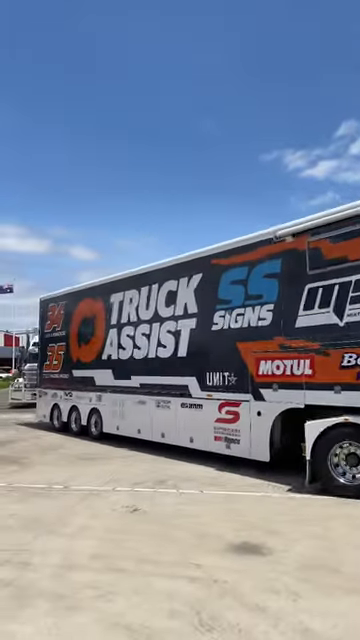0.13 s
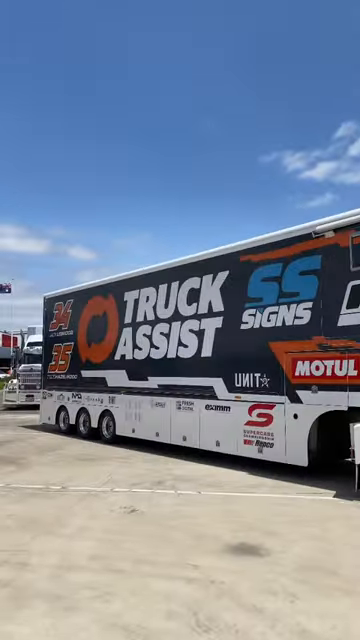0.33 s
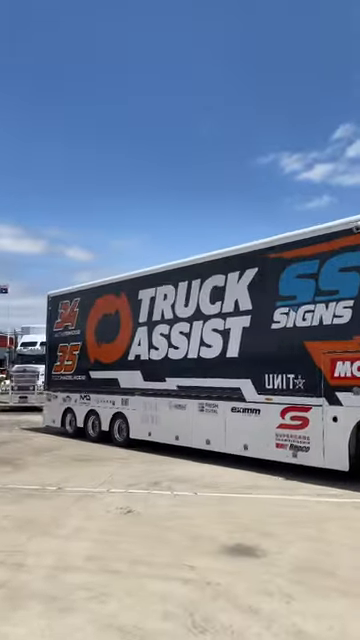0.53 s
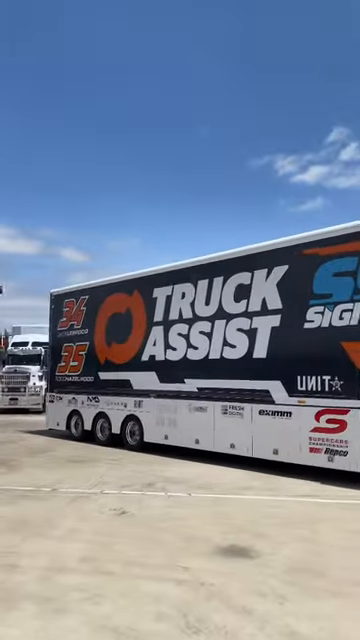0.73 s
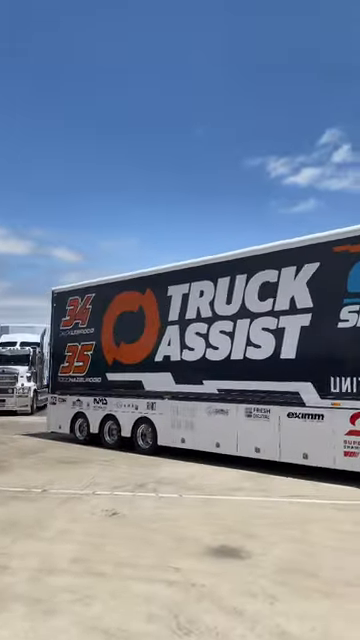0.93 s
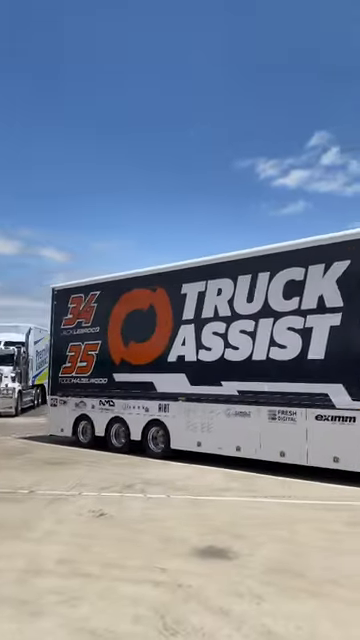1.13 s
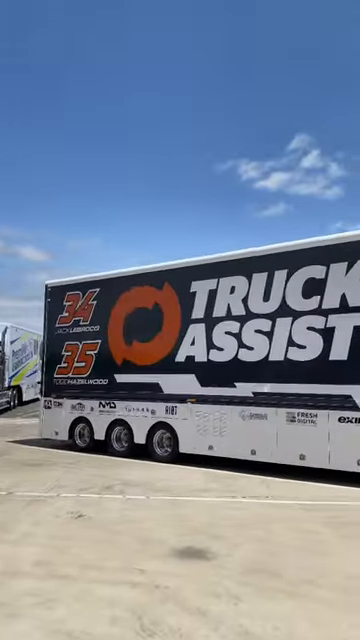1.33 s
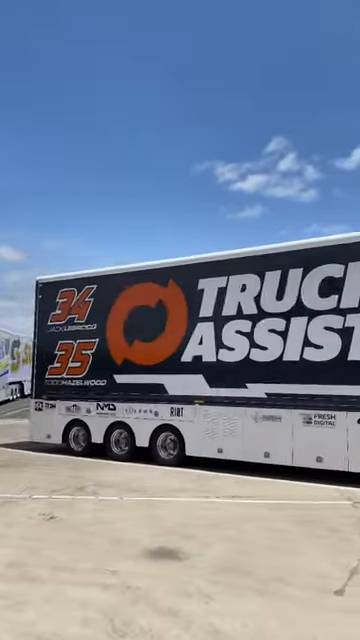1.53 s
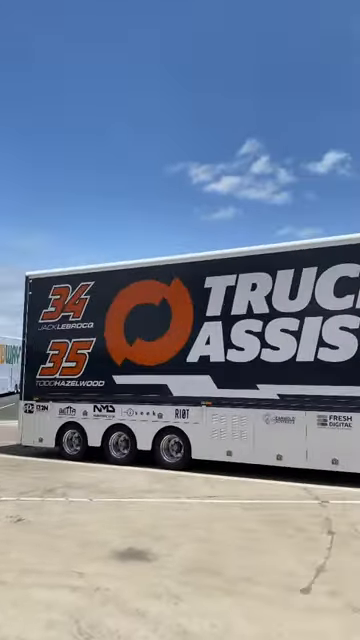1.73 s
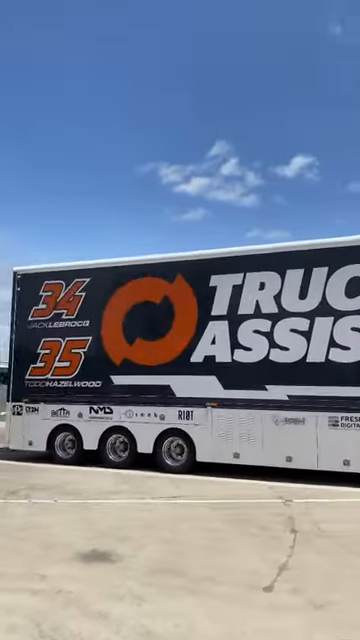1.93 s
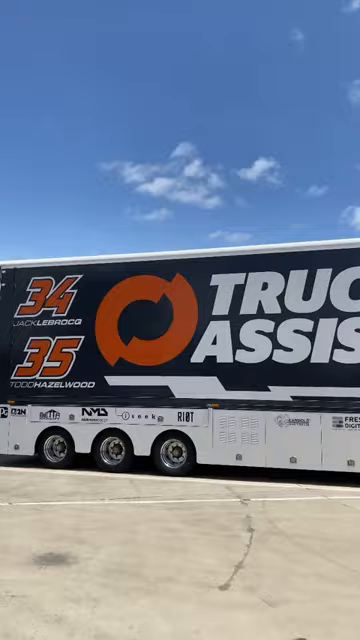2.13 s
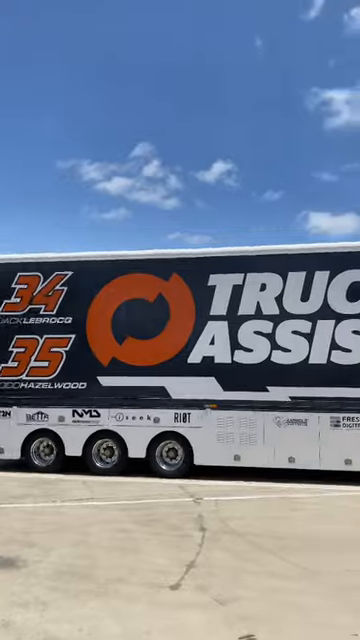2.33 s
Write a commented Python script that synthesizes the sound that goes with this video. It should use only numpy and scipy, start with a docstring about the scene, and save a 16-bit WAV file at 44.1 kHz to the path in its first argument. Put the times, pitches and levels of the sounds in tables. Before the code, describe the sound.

A truck's diesel engine clatters and throbs louder as its revs rise, with an air horn blast

```python
"""A truck's six-cylinder diesel clatters and its exhaust throbs louder as the revs rise unevenly.
The exhaust is firing-locked tones over shaped noise; the clatter is noise knocking at each firing.
A parked engine drones on steady tones; compressed air hisses out as noise that dulls and dies.
A reedy air horn sounds for most of a second: wavering harmonics and a rasp, echoed by the yard."""
import sys
import numpy as np
from scipy import signal
from scipy.fft import rfft, irfft
from scipy.io import wavfile

SR = 44100
rng = np.random.default_rng(int(sys.argv[2]) if len(sys.argv) > 2 else 0)


def wrap_up_sound(samples):
    """Save the sound to the file named by the first command line argument, as 16-bit audio."""
    columns = np.atleast_2d(samples).T
    # keep every value between -1 and 1, then stretch to whole-number steps
    tamed = np.clip(columns, -1, 1)
    steps = np.round(tamed * 32767).astype(np.int16)
    wavfile.write(sys.argv[1], SR, steps)


N = 104649
T, HZ = np.arange(N) / SR, np.fft.rfftfreq(N, 1 / SR)
CYLINDERS = 6

# truck firing rate, shared by exhaust and engine: time_s, firing_hz
FIRING_RATE = [(0, 56.86), (.93, 57.03), (1.02, 58.03), (1.23, 58.96), (1.4, 60.96), (1.47, 61.58),
               (1.7, 58.52), (1.9, 58.3), (2.1, 61.4), (2.2, 62.73), (2.37, 62.9)]


def amp(db):
    """Decibels to gain."""
    return 10 ** (np.asarray(db) / 20)


def curve(points):
    """Control curve at every sample, linear between points."""
    return np.interp(T, *np.transpose(points))


def read(points, hz, column=1):
    """One table column, interpolated on a log-frequency axis."""
    table = np.transpose(points)
    return np.interp(np.log(hz + 1), np.log(table[0] + 1), table[column])


def waver(rate_hz):
    """Slow random signal of zero mean and unit RMS."""
    lowpass = np.exp(-(HZ / rate_hz) ** 2) * (HZ > 0)
    x = irfft(rfft(rng.standard_normal(N)) * lowpass, N)
    return x / x.std()


def complex_waver(rate_hz):
    """Independent in-phase and quadrature wavers: amplitude and phase both wander."""
    return waver(rate_hz) + 1j * waver(rate_hz)


def noise(spectrum):
    """Two unrelated Gaussian noises with the given density."""
    white = rfft(rng.standard_normal((2, N)))
    return irfft(white * amp(read(spectrum, HZ)), N) * np.sqrt(SR / 2)


def ports(pair, field):
    """Blend a shared and a stray sound into two microphone ports, by frequency."""
    ends = np.minimum(np.minimum(T, T[::-1]) / .003, 1)
    shared, stray = rfft(pair * ends)
    likeness = np.clip(read(field, HZ), -1, 1)
    lead_rad = read(field, HZ, column=2)
    tilt = amp(read(field, HZ, column=3))
    blend = likeness * shared + np.sqrt(1 - likeness ** 2) * stray
    left = blend * tilt * np.exp(1j * lead_rad)
    level = np.sqrt(2 / (1 + tilt ** 2))  # holds the pair's total power
    return irfft(np.array([left, shared]) * level, N)


def orders(hz, table, unsteady, rate_hz, loose=True):
    """Unsteady tones locked to a cycle rate; start phases are random if loose, else aligned."""
    turns = np.cumsum(hz) / SR
    total = np.zeros(N)
    for multiple, level_db in table:
        tone = np.exp(2j * np.pi * (multiple * turns + loose * rng.random()))
        unsteadiness = 1 + unsteady * complex_waver(rate_hz)
        total += amp(level_db) * (tone * unsteadiness).real
    return np.sqrt(2) * total


# exhaust level: time_s, level_db
EXHAUST_LEVEL = [(0, -57.5), (.8, -48), (1.0, -39), (1.2, -35), (1.35, -29.5), (1.47, -23), (1.56, -25.5),
                 (1.68, -28.5), (1.9, -26.5), (2.04, -27), (2.14, -24), (2.37, -21.5)]
# firing-rate boom: time_s, level_db
BOOM_LEVEL = [(0, -73), (.85, -38.5), (1.0, -37), (1.06, -45), (1.12, -38), (1.19, -36), (1.25, -43),
              (1.33, -46), (1.41, -30.5), (1.6, -31.5), (1.72, -34.5), (1.87, -27), (2.0, -28.5),
              (2.07, -34), (2.15, -24.5), (2.37, -27.5)]
# pipe bark at three times the firing rate: time_s, level_db
BARK_LEVEL = [(0, -58.5), (.6, -50), (.97, -49), (1.11, -36.5), (1.19, -44), (1.25, -36), (1.35, -33),
              (1.44, -38), (1.5, -39.5), (1.57, -40.5), (1.7, -35), (1.93, -33), (2.0, -44.5),
              (2.04, -35.5), (2.09, -40.5), (2.31, -40), (2.37, -48)]
# pulse harmonics: firing_multiple, db_re_exhaust_level
FIRING_HARMONICS = [(2, 0.5), (4, -21)]
# uneven cylinders: engine_cycle_multiple, db_re_exhaust_level
UNEVEN_ORDERS = [(8, -26.5), (9, -19), (10, -12.5), (11, -22), (13, -22), (14, -21), (15, -17.5), (16, -17),
                 (17, -24.5), (20, -33), (22, -23.5)]
# turbulent rumble at the loudest exhaust: freq_hz, density_db_per_hz
RUMBLE_SPECTRUM = [(15, -81.5), (28, -97.5), (45, -56), (90, -57), (160, -54.5), (230, -60), (320, -84),
                   (600, -118)]
LOW_CUT_HZ = 50
RUMBLE_FOLLOWS_DB_PER_DB, RUMBLE_WIDTH = 0.71, 0.12


def exhaust():
    """Firing pulses thinned in the deep bass, uneven cylinder tones, and turbulent rumble."""
    firing_hz, level_db = curve(FIRING_RATE), curve(EXHAUST_LEVEL)
    boom = orders(firing_hz, [(1, 1.0)], unsteady=0.11, rate_hz=4.5, loose=False)
    boom *= amp(curve(BOOM_LEVEL))
    pulses = orders(firing_hz, FIRING_HARMONICS, unsteady=0.032, rate_hz=10, loose=False)
    pulses *= amp(level_db)
    bark = orders(firing_hz, [(3, 0.016)], unsteady=0.044, rate_hz=7.9, loose=False)
    bark *= amp(curve(BARK_LEVEL))
    low_cut = signal.butter(2, LOW_CUT_HZ, "high", fs=SR)
    throb = signal.lfilter(*low_cut, boom + pulses + bark)
    uneven = orders(firing_hz / CYLINDERS, UNEVEN_ORDERS, unsteady=0.19, rate_hz=8.5)
    uneven *= amp(level_db)
    rumble_gain = amp(RUMBLE_FOLLOWS_DB_PER_DB * (level_db - level_db.max()))
    rumble, spread = noise(RUMBLE_SPECTRUM) * rumble_gain
    sides = RUMBLE_WIDTH * np.array([spread, -spread])
    balance_db = [[-.35], [.35]]
    return (uneven - throb + rumble + sides) * amp(balance_db)


# block tones: engine_cycle_multiple, level_db
BLOCK_TONES = [(9, -47), (14, -52.5), (18, -55), (21, -58.5), (27, -56.5), (33, -62), (39, -61)]
# clatter before its level curve: freq_hz, density_db_per_hz
CLATTER_SPECTRUM = [(20, -80.5), (45, -58.5), (100, -57), (200, -67), (330, -68.5), (550, -70), (800, -72),
                    (1200, -73.5), (2000, -79), (2700, -87), (4400, -99), (9000, -115)]
# clatter gain: time_s, gain_db
CLATTER_GAIN = [(0, -5), (.45, -4.5), (.85, -3.5), (1.1, -3.5), (1.5, -1.5), (1.8, 1.2), (2.05, 1.2),
                (2.37, 2)]
# running hiss before its level curve: freq_hz, density_db_per_hz
FIZZ_SPECTRUM = [(1200, -100), (2500, -91.5), (3500, -88), (4400, -93), (5600, -91), (8000, -92.5),
                 (10500, -119.5), (13000, -104), (15200, -113)]
# running hiss gain: time_s, gain_db
FIZZ_GAIN = [(0, -5), (.5, -2.5), (.82, -1.5), (1.25, 3.5), (1.6, 2.5), (1.8, 3.5), (2.07, 0.5),
             (2.37, 7.5)]
# truck stereo: freq_hz, likeness, left_lead_rad, left_minus_right_db
TRUCK_FIELD = [(60, 1, -0.5, -1.5), (151, 0.86, -0.3, 0), (322, 0.96, 0.8, -3), (652, .6, -1.26, -7),
               (1140, 0.87, -2, -8), (1745, 0.81, 0, -6.5), (2290, 0.64, -1.3, 1), (2940, 0.32, -2.5, -5),
               (4500, 0.52, -3, -.5), (5720, .6, -4.5, 1), (7330, 0.67, -3, 1.5), (8350, 1, -np.pi, -2),
               (11300, 1, -np.pi, -0.5), (12300, 0.45, -2.5, 0.5), (14450, .7, -3, -0.5)]
KNOCK_DEPTH, KNOCK_DECAY_CYCLES = 0.19, 0.16  # cycles of firing


def engine():
    """Block tones, noise that knocks and decays at each firing, and a fine running hiss."""
    firing_hz = curve(FIRING_RATE)
    block = orders(firing_hz / CYLINDERS, BLOCK_TONES, unsteady=0.54, rate_hz=10)
    firing_phase = np.cumsum(firing_hz) / SR % 1
    knock = 1 + KNOCK_DEPTH * np.exp(-firing_phase / KNOCK_DECAY_CYCLES)
    knock /= np.sqrt(np.mean(knock ** 2))
    clatter = noise(CLATTER_SPECTRUM) * knock * amp(curve(CLATTER_GAIN) + 0.74 * waver(25))
    fizz = noise(FIZZ_SPECTRUM) * amp(curve(FIZZ_GAIN) + 0.7 * waver(25))
    return block + ports(clatter + fizz, TRUCK_FIELD)


PARKED_HZ = 53.95
# parked engine tones: firing_multiple, level_db
PARKED_TONES = [(1, -44), (2.5, -54.5)]


def parked_engine():
    """A low drone: two slightly unsteady tones at a constant firing rate."""
    return orders(np.full(N, PARKED_HZ), PARKED_TONES, unsteady=0.089, rate_hz=15)


# jet as the valve opens: freq_hz, density_db_per_hz
AIR_FRESH = [(800, -100), (2000, -79), (3000, -86), (4100, -88), (5800, -78), (8000, -87), (10500, -91),
             (12800, -85.5), (15200, -101)]
# jet once dulled: freq_hz, density_db_per_hz
AIR_DULLED = [(800, -93), (2000, -77.5), (3000, -82.5), (4100, -81), (5800, -76), (8000, -82.5),
              (10500, -96), (12800, -99.5), (15200, -108)]
# air stereo: freq_hz, likeness, left_lead_rad, left_minus_right_db
AIR_FIELD = [(393, 1, 1, -5), (613, 0.73, -1, -5), (810, 0.65, -2.5, -6), (1040, 0.61, -1.5, -9),
             (1700, 0.53, -7, -5), (2007, 0.69, -5.5, -2), (2820, 0.59, -11, -2.5),
             (5070, 0.83, -10.5, -3.5), (5600, .8, -11, 2.5), (7540, 0.47, -9.5, -0.5),
             (8380, 1, -3 * np.pi, -0.5), (11500, 1, -3 * np.pi, 7), (11600, 0.21, -10, -3),
             (14200, 0.89, -7.5, 4)]
AIR_START_S, AIR_RISE_S, AIR_END_S = 0.83, 0.085, 1.156
AIR_FADE_DB_PER_S, AIR_DULL_S = 103.5, 0.27


def air_release():
    """A valve opens, air jets out, and the hiss dulls and dies as the pressure falls."""
    age_s = T - AIR_START_S
    fade_db = -AIR_FADE_DB_PER_S * np.maximum(T - AIR_END_S, 0)
    flow = np.clip(age_s / AIR_RISE_S, 0, 1) * amp(fade_db)
    spent = np.clip(age_s / AIR_DULL_S, 0, 1) ** 2
    jet = noise(AIR_FRESH) * np.sqrt(1 - spent) + noise(AIR_DULLED) * np.sqrt(spent)
    return ports(jet * flow * amp(.5 * waver(30)), AIR_FIELD)


# yard echo decay: freq_hz, t60_s
YARD_DECAY = [(200, 0.96), (800, 0.98), (3000, 0.74), (8000, 0.4)]


def yard(x):
    """Scattered echoes from trailers and paving, the treble dying first."""
    taps = rng.standard_normal((2, SR)) * (rng.random((2, SR)) < 2000 / SR)  # about 2000 per second
    hz, t, z = signal.stft(taps, SR, nperseg=256)
    decay = amp(-60 * t / read(YARD_DECAY, hz)[:, None])
    tail = signal.istft(z * decay, SR, nperseg=256)[1]
    return signal.fftconvolve(x, tail / np.linalg.norm(tail[0]), axes=1)[:, :N]


# horn pitch before jitter: time_s, pitch_hz
HORN_PITCH_HZ = [(.95, 203.3), (1.01, 201.8), (1.05, 203.2), (1.17, 202.8), (1.25, 204), (1.3, 203.6),
                 (1.35, 204.9), (1.41, 203.2), (1.54, 203.9), (1.6, 201.7), (1.66, 205.2), (1.7, 204),
                 (1.78, 205.4)]
# horn harmonic balance: freq_hz, db_re_horn_db
HORN_BALANCE = [(203, -5.5), (407, -0.6), (610, -2), (814, -3.5), (1020, -5), (1220, -9), (1430, -9.5),
                (1630, -10.5), (1830, -10.5), (2040, -10), (2240, -16.5), (2450, -14), (2850, -14),
                (3800, -23), (4600, -19.5), (6000, -23.5), (8000, -29.5)]
# second harmonic swell: time_s, gain_db
SECOND_SWELL = [(.96, 3.5), (1.0, -12), (1.05, -1.5), (1.13, -8), (1.17, 6), (1.21, 3), (1.26, -3),
                (1.32, 4), (1.355, 0), (1.39, -17), (1.44, 0.5), (1.5, -0.5), (1.6, 2), (1.7, 1.5),
                (1.76, -4.5)]
# third harmonic swell: time_s, gain_db
THIRD_SWELL = [(.95, 6.5), (1.02, 6), (1.07, -3), (1.11, 5), (1.165, -8), (1.205, 4.5), (1.24, -5),
               (1.27, 8), (1.31, -3.5), (1.35, 4), (1.425, -11.5), (1.485, 2.5), (1.53, -10), (1.56, -2.5),
               (1.66, 0), (1.72, -2), (1.77, 1.5)]
# fourth harmonic swell: time_s, gain_db
FOURTH_SWELL = [(.98, 0), (1.06, 3), (1.12, -1.5), (1.18, -2.5), (1.23, -2), (1.28, 5), (1.32, -1.5),
                (1.45, -1), (1.51, 6.5), (1.55, -7), (1.6, 6.5), (1.64, 1), (1.71, 5), (1.77, 3)]
# brief flares of the harmonics near 2 kHz: time_s, gain_db
FLARE_SWELL = [(1.0, 2.5), (1.08, -4.5), (1.13, 5.5), (1.17, 1), (1.22, 3.5), (1.29, -5.5), (1.35, 6.5),
               (1.42, -5), (1.49, 2), (1.53, -7.5), (1.58, -2), (1.61, -6), (1.655, 3), (1.71, -3.5),
               (1.78, -5.5)]
# air rasping through the horn, before flow: freq_hz, density_db_per_hz
RASP_SPECTRUM = [(200, -100), (500, -76.5), (800, -73.5), (1300, -76.5), (1800, -77), (2400, -82.5),
                 (3200, -89.5), (6000, -105)]
# horn stereo: freq_hz, likeness, left_lead_rad, left_minus_right_db
HORN_FIELD = [(400, .9, -.6, -5.5), (610, .8, -1.55, -5.5), (810, 0.52, -2.5, -6), (1020, .65, -1.54, -7.5),
              (1300, .55, -1.4, -6), (1600, .65, 0, -4), (2050, .75, 0, -3.5), (2520, .65, 1, -1.5),
              (2840, .6, 2.5, -1.5), (5400, 0.55, 1.8, -0.5), (8300, 1, np.pi, -1)]
HORN_START_S, HORN_END_S, HORN_RISE_S, HORN_FADE_S = 0.95, 1.756, .012, 0.17
HORN_DB, HORN_JITTER = -40.5, 0.0075  # jitter: RMS fraction of pitch
HORN_BLOOM_S = 0.013  # extra rise time per harmonic above the third
HORN_DULL_DB_PER_S = 6.5  # sag of harmonics without a swell curve
RASP_PUFF_CYCLES, RASP_FADE_DB_PER_S, RASP_RISE_S = .3, 14, 0.043


def horn(fading=0.92, fading_hz=22, strong_fading=0.16, flare_fading=0.55, wet_db=-13, count=39):
    """An air-blown diaphragm buzzes and rasps; high harmonics rise slower and stop sooner."""
    pitch_hz = curve(HORN_PITCH_HZ)
    turns = np.cumsum(pitch_hz * (1 + HORN_JITTER * waver(90))) / SR
    swells = {2: SECOND_SWELL, 3: THIRD_SWELL, 4: FOURTH_SWELL}
    age_s, after_s = T - HORN_START_S, np.maximum(T - HORN_END_S, 0)
    pair = np.zeros((2, N))
    for k in range(1, count + 1):
        onset = np.clip(age_s / (HORN_RISE_S + HORN_BLOOM_S * max(k - 3, 0)), 0, 1)
        release = np.exp(-k * after_s / HORN_FADE_S)
        swell_db, depth = -HORN_DULL_DB_PER_S * age_s, fading
        if k in swells:
            swell_db, depth = curve(swells[k]), strong_fading
        elif k in (9, 10, 11):
            swell_db, depth = curve(FLARE_SWELL), flare_fading
        level_db = HORN_DB + read(HORN_BALANCE, k * pitch_hz.mean()) + swell_db
        carrier = np.exp(2j * np.pi * (k * turns + rng.random()))
        tone = amp(level_db) * onset * release * carrier
        shared = (1 + depth * complex_waver(fading_hz)) / np.sqrt(1 + 2 * depth ** 2)
        stray = complex_waver(fading_hz) / np.sqrt(2)
        pair += np.sqrt(2) * np.array([tone * shared, tone * stray]).real
    flow = np.clip(age_s / RASP_RISE_S, 0, 1) * amp(-RASP_FADE_DB_PER_S * age_s)
    flow *= np.exp(-10 * after_s / HORN_FADE_S)
    puffs = np.exp(-(turns % 1) / RASP_PUFF_CYCLES)
    pair += noise(RASP_SPECTRUM) * flow * puffs / np.sqrt(np.mean(puffs ** 2))
    return ports(pair + amp(wet_db) * yard(pair), HORN_FIELD)


def scene():
    """Sum of everything heard in the yard."""
    return exhaust() + engine() + parked_engine() + air_release() + horn()


EDGE_HZ = 15400


def record(dry):
    """The recorder's zero-phase band limit, with a 4 ms fade at each end."""
    ends = np.minimum(np.minimum(T, T[::-1]) / .004, 1)
    lowpass = signal.firwin(255, EDGE_HZ, window=("kaiser", 9), fs=SR)
    return signal.filtfilt(lowpass, 1, dry * ends)


dry = scene()
out = record(dry)
wrap_up_sound(out)
```